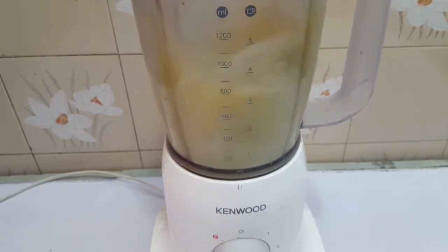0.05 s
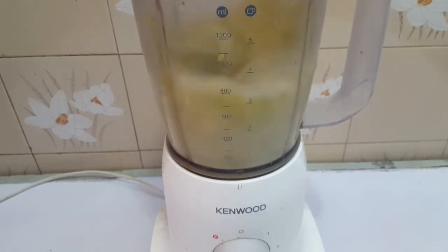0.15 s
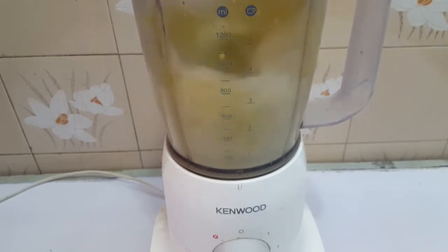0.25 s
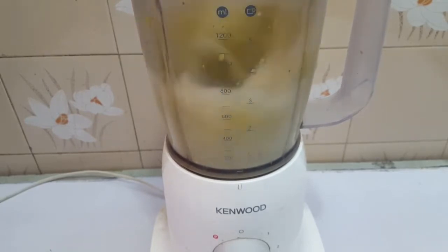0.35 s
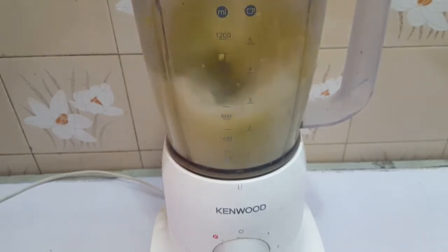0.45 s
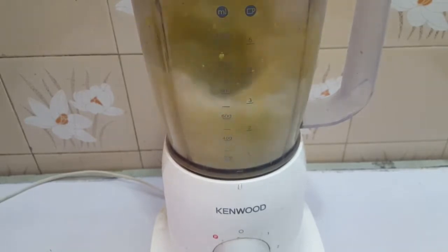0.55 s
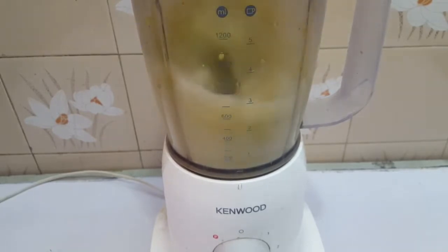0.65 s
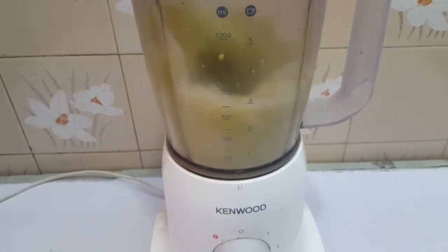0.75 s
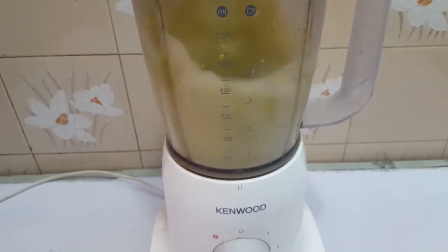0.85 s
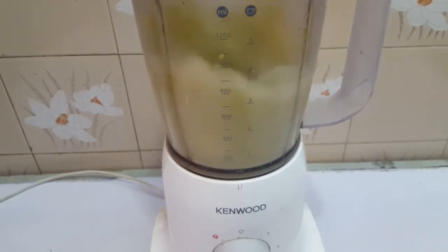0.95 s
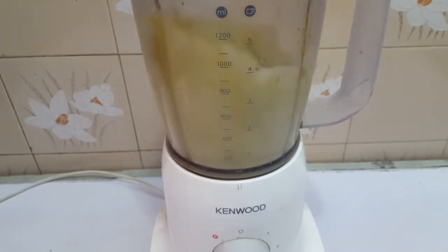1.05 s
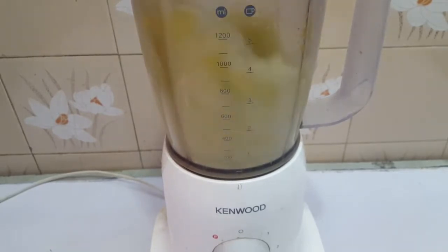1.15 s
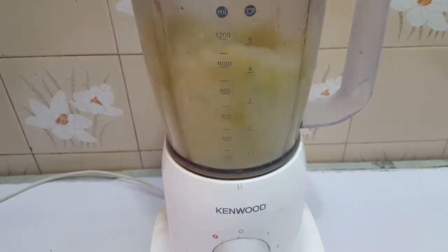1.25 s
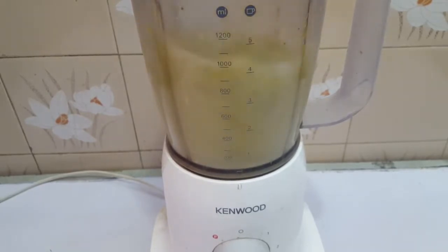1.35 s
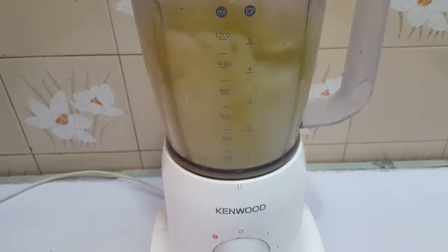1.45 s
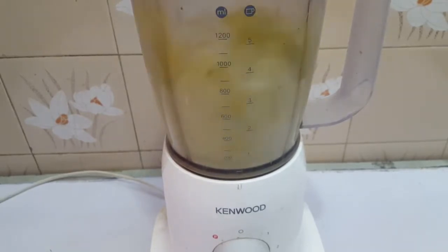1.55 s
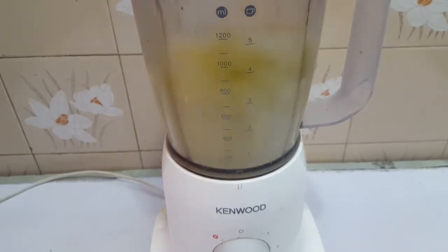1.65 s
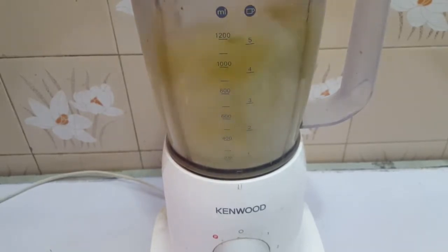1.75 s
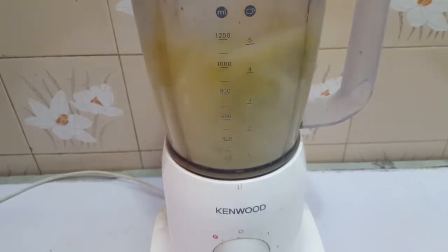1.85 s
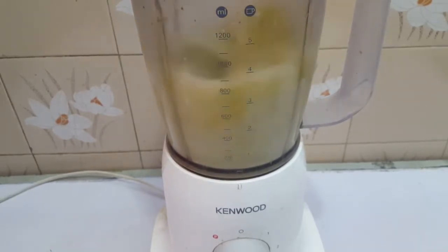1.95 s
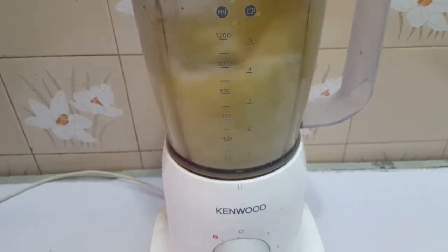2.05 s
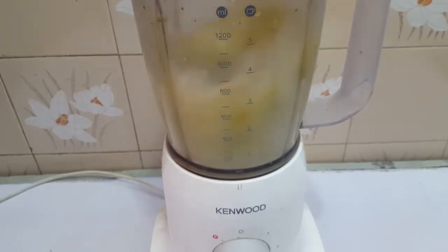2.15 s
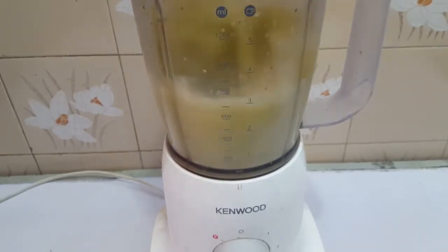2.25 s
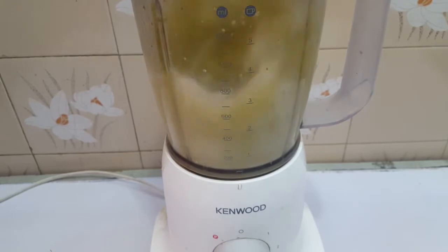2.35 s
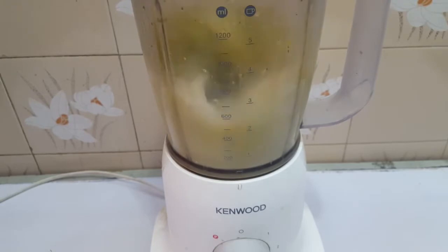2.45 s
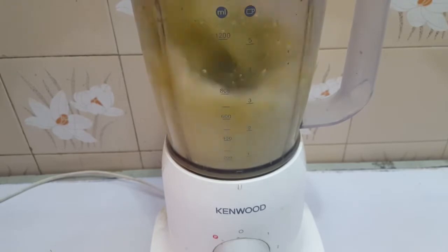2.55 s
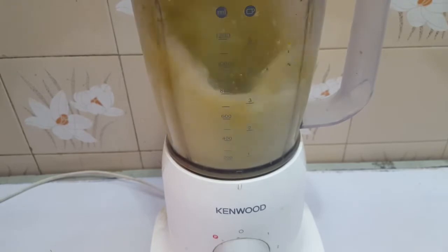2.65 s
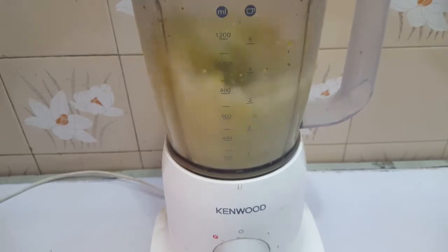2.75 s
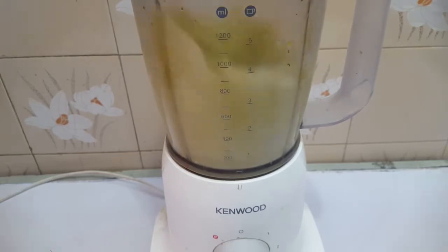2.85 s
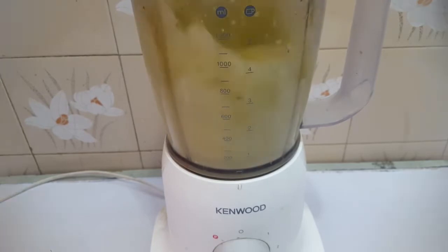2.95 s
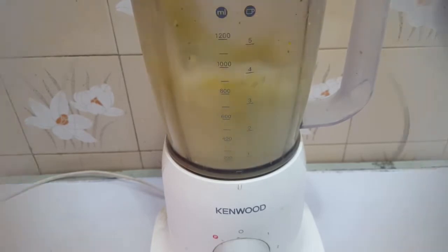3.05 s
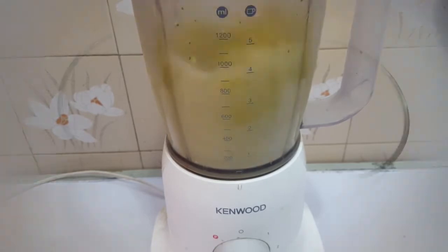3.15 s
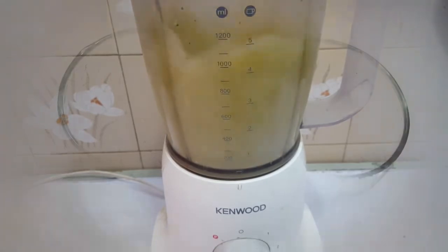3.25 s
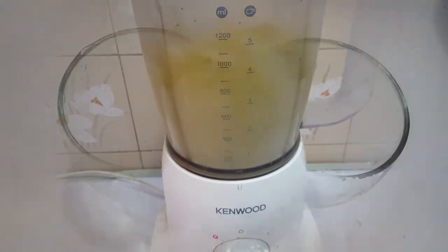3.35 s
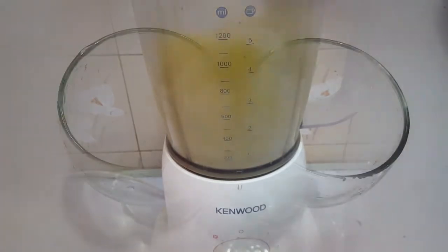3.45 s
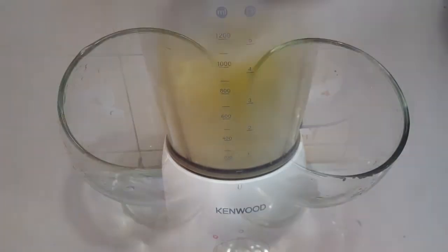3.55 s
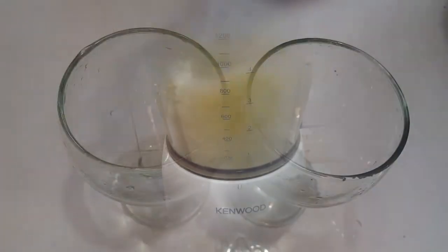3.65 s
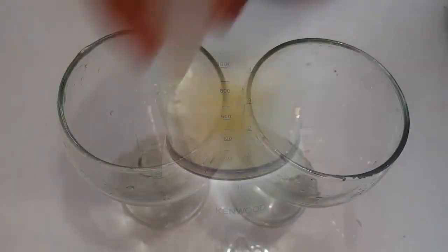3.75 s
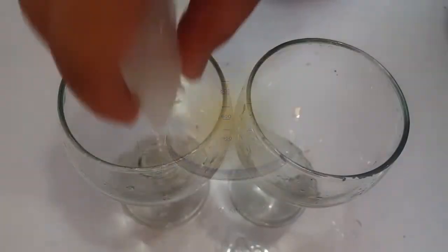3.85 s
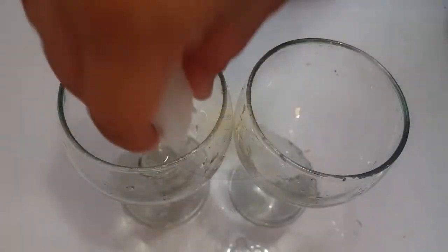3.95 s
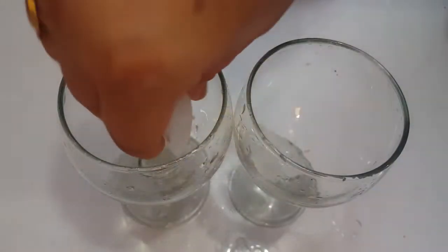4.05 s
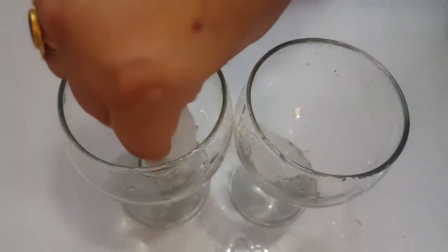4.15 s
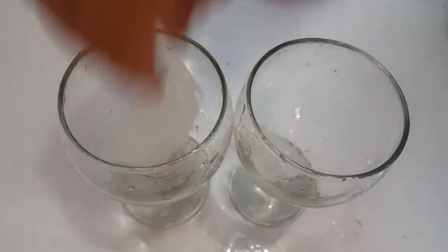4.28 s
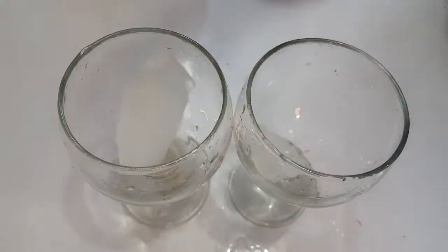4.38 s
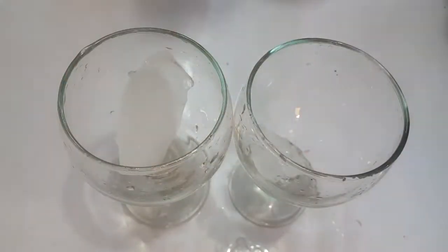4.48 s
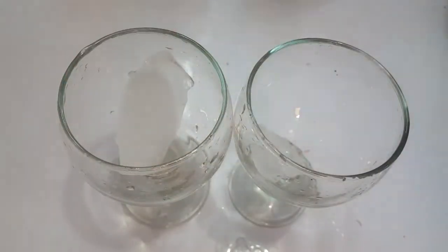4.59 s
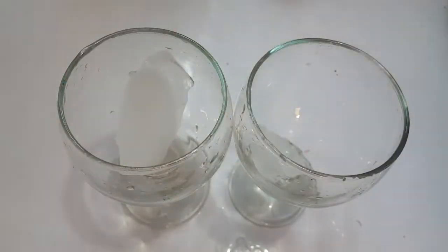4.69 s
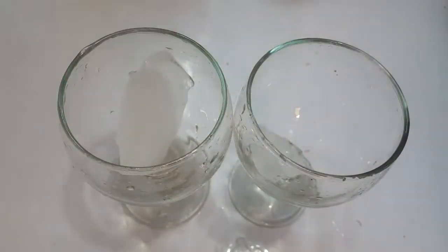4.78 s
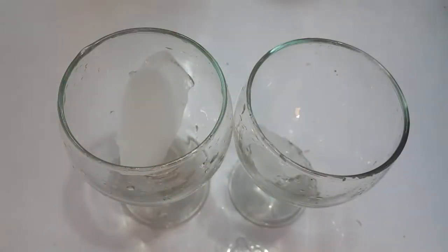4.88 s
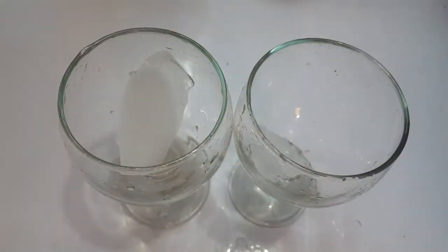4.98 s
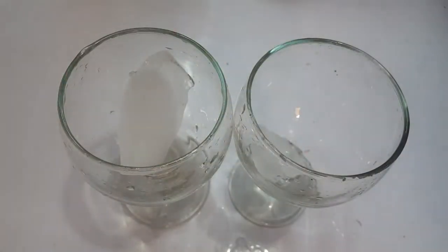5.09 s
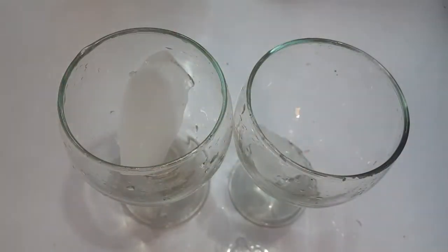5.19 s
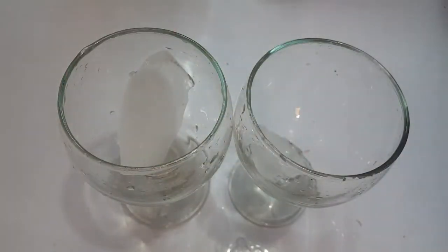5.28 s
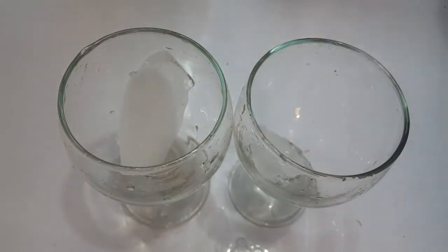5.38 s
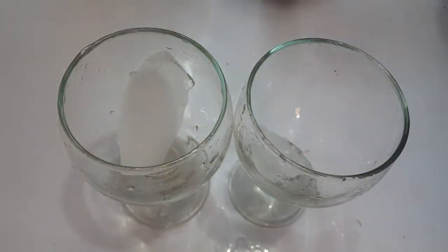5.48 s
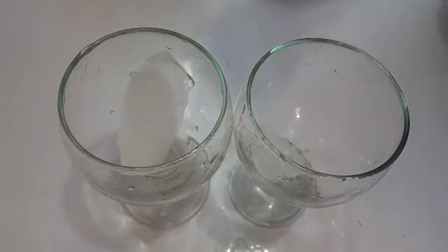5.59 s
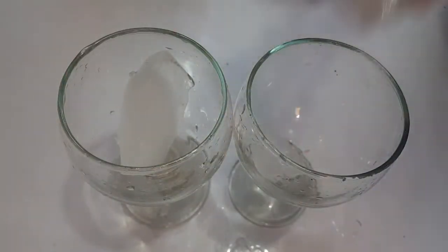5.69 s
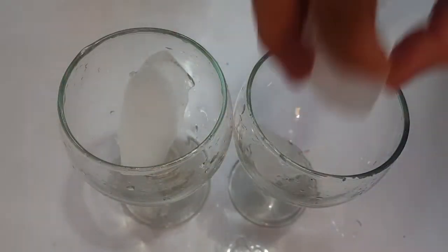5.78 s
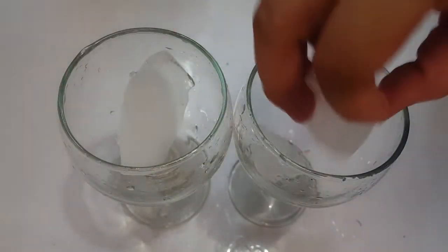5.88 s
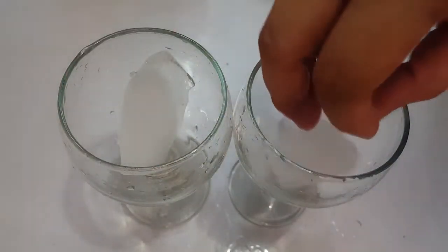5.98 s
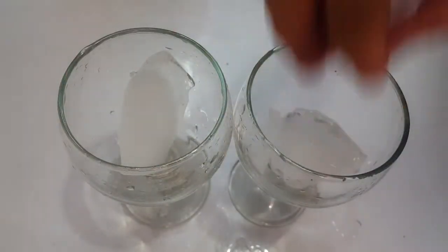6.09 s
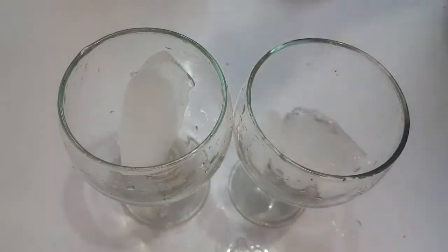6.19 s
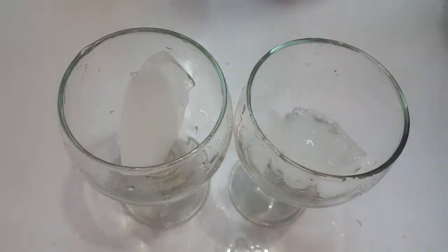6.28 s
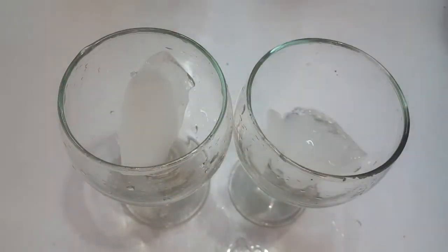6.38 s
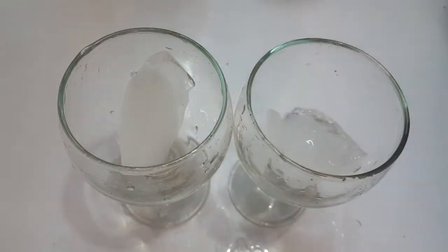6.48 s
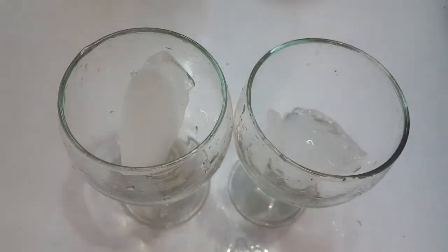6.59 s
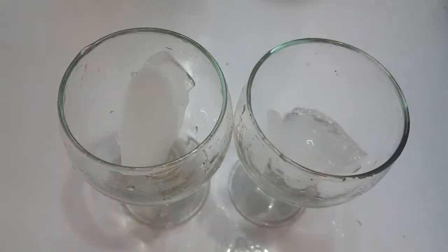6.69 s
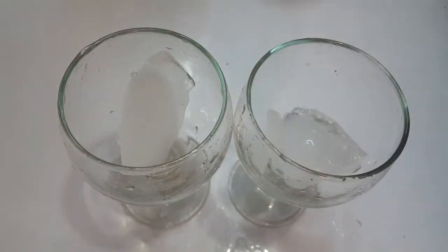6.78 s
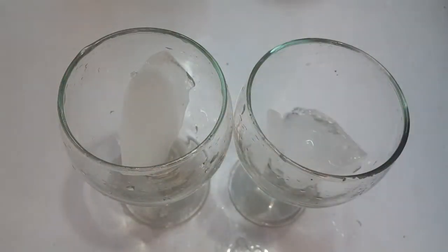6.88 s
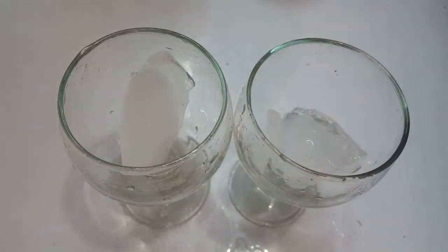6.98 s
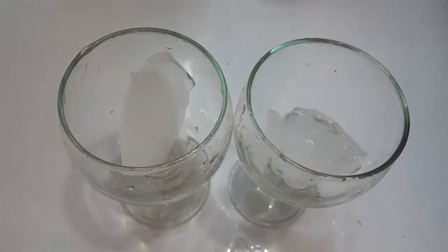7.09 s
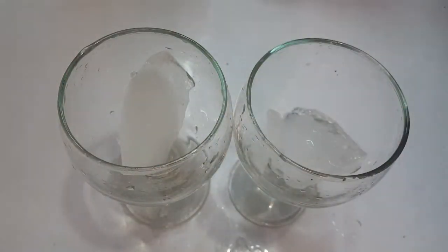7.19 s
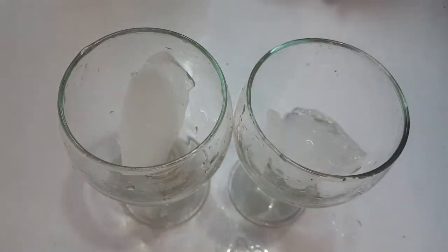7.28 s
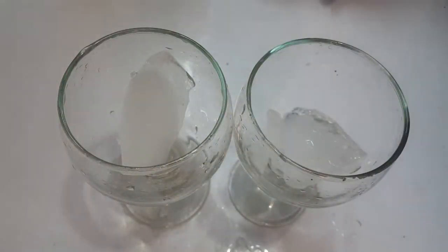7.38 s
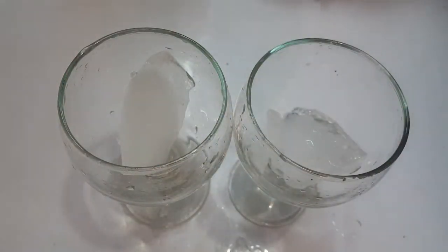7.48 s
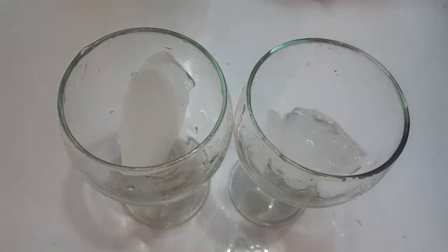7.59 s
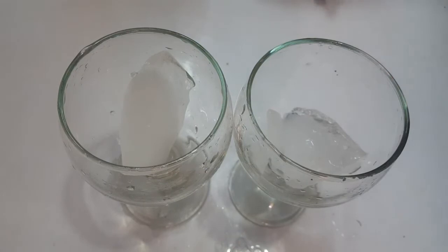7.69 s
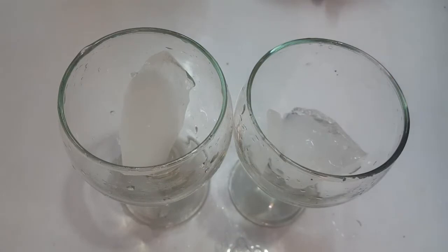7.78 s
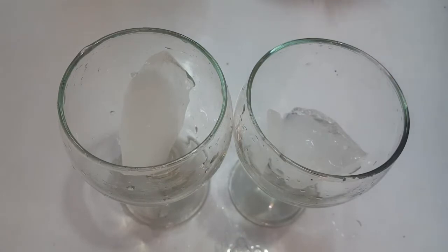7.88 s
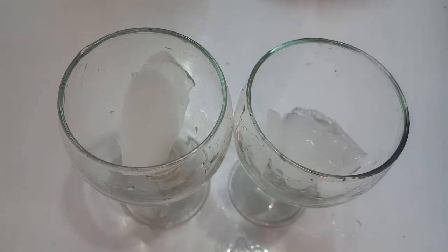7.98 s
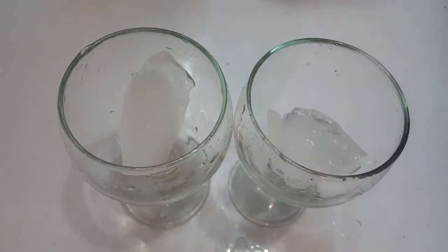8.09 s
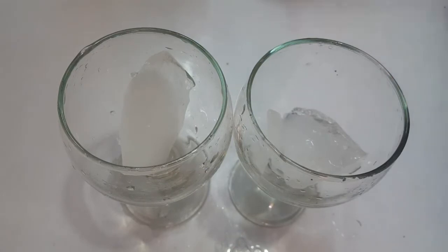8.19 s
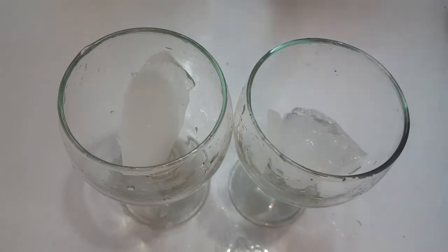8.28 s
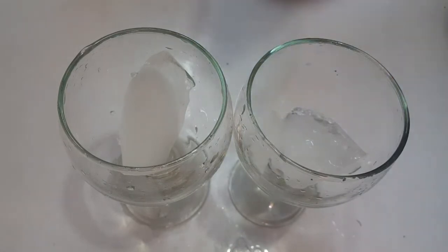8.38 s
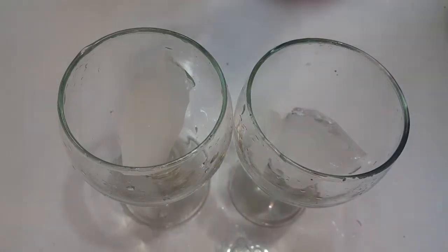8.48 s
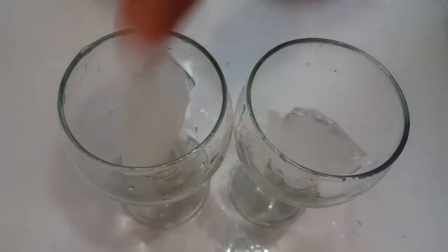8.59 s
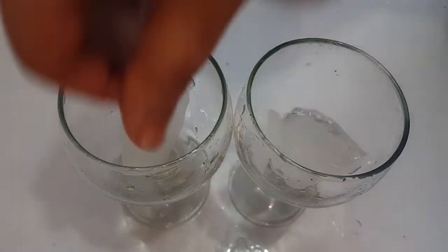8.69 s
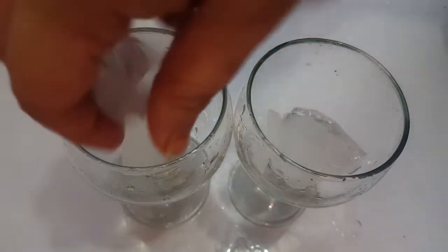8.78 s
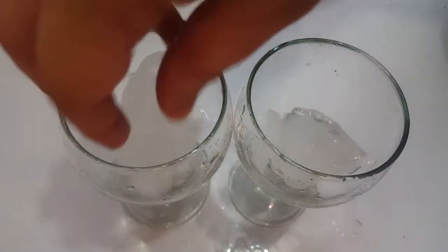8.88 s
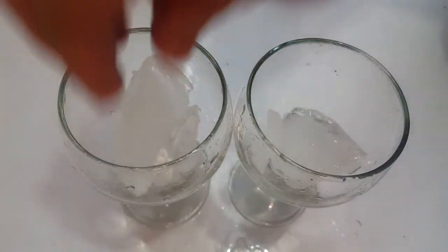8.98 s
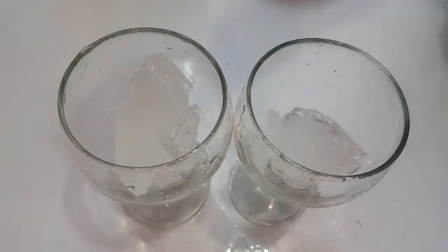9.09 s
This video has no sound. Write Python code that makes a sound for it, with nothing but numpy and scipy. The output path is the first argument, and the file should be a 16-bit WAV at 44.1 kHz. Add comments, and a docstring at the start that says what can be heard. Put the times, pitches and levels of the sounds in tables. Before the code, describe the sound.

Steady buzzing, sloshing blender stops dead; in the quiet kitchen, ice pieces knock into glass bowls, separated by crunchy handfuls of ice being stirred.

```python
"""A blender churns on a kitchen counter, pulp beating the jug, until it is cut off in a brief rush of noise.
Faint pings follow, then ice drops into a stemmed glass: ice and bowl ring as dying sines, chips rattle as
grainy noise and the counter thuds. A hand rummages in a heap of ice, in strokes of crackle and rough knocks;
ice falls into a second glass, the hand rummages again, and more ice lands in the first glass.
The tiled kitchen hums faintly as shaped noise throughout and echoes the ice through sparse random taps."""
import sys
import numpy as np
from scipy import signal
from scipy.io import wavfile
from scipy.ndimage import uniform_filter1d

SR = 44100
rng = np.random.default_rng(int(sys.argv[2]) if len(sys.argv) > 2 else 0)


def pcm_store(signal):
    """Save signal as 16-bit PCM."""
    levels = np.round(np.clip(np.atleast_2d(signal), -1, 1) * 32767)
    wavfile.write(sys.argv[1], SR, levels.astype(np.int16).T)


N = 403074

# counter modes under the heap: (frequency [Hz], relative level [dB], t60 [s])
COUNTER = [(136.3, 0, 0.28), (194, -5.5, 0.29), (253.4, 9, 0.086), (314, -3, 0.2), (497, -2, 0.082),
           (546, 4, 0.052)]
CUT_S = 3.437  # the blender stops (s)
PAN_DB, PAN_SPREAD_DB = 3.5, 3.5  # left over right for ice blows and knocks, and its scatter (dB)
COUNTER_PAN_DB = 6  # the counter's thud is louder on the left (dB)


def gain_of(db):
    """Decibels to amplitude."""
    return 10 ** (np.asarray(db, float) / 20)


def evened(x):
    """Scales to rms 1."""
    return x / np.sqrt(np.mean(x ** 2) + 1e-20)


def peaked(x):
    """Scales to peak 1."""
    return x / abs(x).max()


def read(points, hz):
    """Reads a (frequency [Hz], value) table on a log-frequency axis."""
    f, value = np.transpose(points)
    return np.interp(np.log(hz + 1), np.log(f + 1), value)


def humps(peaks, hz):
    """Sum in dB of bell-shaped resonances."""
    return sum(db / (1 + (2 * (hz - f) / width) ** 2) for f, width, db in peaks)


def add(mix, s, sound, pan_db):
    """Mixes in a sound at s seconds, the left channel pan_db over the right."""
    part = mix[:, round(s * SR):][:, :sound.shape[-1]]
    part += gain_of([[pan_db / 2], [-pan_db / 2]]) * sound[..., :part.shape[1]]


def band(x, low_hz, high_hz):
    """Causal band-pass."""
    return signal.sosfilt(signal.butter(2, [low_hz, min(high_hz, SR / 2.2)], "band", fs=SR, output="sos"), x)


def blurred(grid, bins, frames):
    """Smooths a spectrogram grid over frequency and time, rms 1."""
    return evened(uniform_filter1d(uniform_filter1d(grid, size=bins, axis=0), size=frames, axis=1))


def wide_noise(colour_db, same, balance, phase, patchy_db, beat, size):
    """Two partly alike channels of noise, pulsed by beat, with drifting patches; colour_db maps Hz to dB."""
    overlap = size * 3 // 4
    hz, _, (left, other) = signal.stft(beat * rng.standard_normal((2, N)), SR, nperseg=size, noverlap=overlap)
    patches = blurred(rng.standard_normal(left.shape), 6, 12)
    patches = patches + 1.03 * blurred(rng.standard_normal(left.shape), 40, 3)
    like = np.clip(read(same, hz), -1, 1)[:, None]
    lag = np.exp(-1j * read(phase, hz))[:, None]
    right = like * left * lag + np.sqrt(1 - like ** 2) * other
    half_db = read(balance, hz)[:, None] / 2
    z = np.array([left * gain_of(half_db), right * gain_of(-half_db)])
    z = z * gain_of(colour_db(hz)[:, None] + patchy_db * patches)
    x = signal.istft(z, nperseg=size, noverlap=overlap)[1][:, :N]
    return x / np.sqrt(np.mean(x.mean(0) ** 2))


def blender():
    """Churning liquid in the jug's resonances, beaten once a turn, with fuzzy orders of the shaft."""
    # shaft orders: (multiple of shaft speed, level against the churn [dB], fuzz width [Hz])
    shaft_orders = [(0.998, -21, 18), (1.972, -19, 10), (3.005, -16, 15.4), (4.02, -26.5, 5),
                    (5.033, -16, 43), (8.09, -20.5, 45), (11.93, -18, 48), (24.1, -30, 48)]
    # colour of the churn: (frequency [Hz], relative density [dB per Hz])
    churn_colour = [(18, -51.5), (60, -86.5), (90, -25.5), (190, -18.5), (350, -8.5), (1000, -1.5),
                    (1280, -10), (2300, -3.5), (3500, -8.5), (3900, -16), (5000, -19), (5400, -24),
                    (9800, -32.5), (10800, -40), (14500, -38.5), (16000, -67)]
    # peaks and dips of jug and housing: (frequency [Hz], width [Hz], height [dB])
    jug = [(109, 66, 4.5), (145, 36, 3), (250, 17, 8.5), (296, 48, -4), (381.6, 30, 11.5), (499.4, 39, 8),
           (691, 127, -6.5), (776, 20, 7.5), (877, 55, 3.5), (1006, 30, 1.5), (1170, 70, 3.5),
           (1550, 10, -2.5), (1833, 50, 2), (1900, 46, -2), (2130, 34, -1), (2787, 150, -7.5),
           (3190, 73, 2), (3530, 4.5, 10)]
    # stereo: (frequency [Hz], left-right likeness)
    churn_same = [(60, 0.75), (180, 1), (550, 0.88), (1650, 0.47), (4970, 0.15), (15000, 0.04)]
    # stereo: (frequency [Hz], left over right [dB])
    churn_balance = [(60, 0.85), (180, 1.4), (550, 0.92), (1650, 4.9), (4970, 1.6), (15000, 4.8)]
    # stereo: (frequency [Hz], lead of the left channel [rad])
    churn_phase = [(0, 0), (2500, 0.68), (3100, 0.036), (5000, 0.14)]
    shaft_hz, level_db = 195.3, -27.5  # mean turns a second; level of churn and orders together
    steady_share = .75  # steady part of each order, beside its noise of rms 1
    n = round(CUT_S * SR)
    t = np.arange(n) / SR
    sag = evened(band(rng.standard_normal(N), 0.99, 5.67))  # the load drags the speed up and down
    turns = np.cumsum(shaft_hz * (1 + 0.0059 * sag)) / SR
    lumps = evened(band(rng.standard_normal(N), 8.0, 194.0))  # pulp thrown against the wall
    beat = (1 + 0.022 * np.cos(2 * np.pi * turns)) * gain_of(0.98 * lumps)
    churn = wide_noise(lambda f: read(churn_colour, f) + humps(jug, f),
                       churn_same, churn_balance, churn_phase, 1.43, beat, size=4096)[:, :n]
    for order, db, width_hz in shaft_orders:
        r = np.exp(-np.pi * width_hz / SR)
        # load shakes each order
        wobble = signal.lfilter([1], [1, -2 * r, r * r], rng.standard_normal((2, 2, n)))
        shaken = steady_share + evened(wobble[:, 0]) + 1j * evened(wobble[:, 1])
        tone = shaken * np.exp(2j * np.pi * order * turns[:n])
        # a shared part and half as much of each channel's own
        churn = churn + gain_of(db) * (tone[0] + .5 * tone).real * gain_of([[1.5], [-1.5]])
    cut = np.clip((CUT_S - t) / 0.0068, 0, 1)
    sound = churn / np.sqrt(np.mean(churn.mean(0) ** 2)) * gain_of(level_db) * cut
    return np.pad(sound, [(0, 0), (0, N - n)])


def hum():
    """The quiet kitchen: noise with fuzzy tones, a swelling middle range and a dying rush after the cut."""
    # colour of the hum: (frequency [Hz], relative density [dB per Hz])
    hum_colour = [(12, -46), (20, -15), (138, -0.5), (262, -5), (357, -10), (527, -13.5), (873, -17),
                  (1190, -25), (1660, -28), (2080, -26.5), (3300, -27), (3900, -30), (9500, -33.5),
                  (10500, -45), (16000, -45)]
    # added middle range: (time [s], level [dB])
    hum_swell = [(3.44, -58.5), (3.6, -72), (4.1, -68), (4.75, -65), (5.45, -67.5), (5.9, -63.5),
                 (6.3, -64), (6.501, -70.5), (6.76, -65.5), (7.8, -68.5), (8.15, -68), (8.45, -67.5),
                 (8.771, -68), (8.88, -60), (9.14, -66)]
    # fuzzy tones: (frequency [Hz], width [Hz], height over the hum [dB])
    hum_tones = [(142.7, 28.4, 9), (260, 56, 4), (517, 7.6, 5), (878, 9.9, 18), (1200, 20, 18.5),
                 (1434, 73, 13.5), (1826, 21, 16), (2150, 24, 13.5)]
    # stereo: (frequency [Hz], left-right likeness)
    hum_same = [(60, 0.99), (240, 0.9), (950, 0.36), (3770, -0.12), (15000, -0.11)]
    # stereo: (frequency [Hz], left over right [dB])
    hum_balance = [(60, 5.6), (240, 3.9), (950, 3), (3770, 2.8), (15000, 5.5)]
    level_db, patchy_db = -59.5, 1.8  # broad hum; unevenness of each layer of patches
    rush_db, rush_t60 = -50.5, 0.26  # dB at the cut, s
    s, swell_db = np.transpose(hum_swell)
    t = np.arange(N) / SR
    x = wide_noise(lambda f: read(hum_colour, f) + humps(hum_tones, f),
                   hum_same, hum_balance, [(0, 0), (SR, 0)], patchy_db, 1, size=2048)
    middle = evened(band(x, 550.0, 3950.0))
    rush = evened(band(band(rng.standard_normal((2, N)), 250., 2700.0), 200., 6000.))
    after = gain_of(rush_db - 60 * abs(t - CUT_S) / rush_t60) * (t > CUT_S)
    return x * gain_of(level_db) + middle * gain_of(np.interp(t, s, swell_db)) + after * (rush + x)


def pings():
    """Soft-edged, fuzzy single tones: a steady core in a narrow band of noise."""
    # faint soft pings: (time [s], level [dB], pitch [Hz])
    ping_list = [(3.582, -58, 1398), (3.8072, -62, 2390), (3.831, -47, 1455), (3.849, -58, 1420),
                 (3.8536, -53.5, 1815), (4.1215, -60.5, 2544), (4.179, -46.5, 830), (4.203, -48, 870),
                 (4.219, -43, 877), (4.2363, -45.5, 2660), (5.599, -63, 1495), (5.697, -50, 2722),
                 (5.987, -47.5, 2715), (5.989, -45.5, 1120), (5.992, -44.5, 1430), (6.0094, -47, 1810),
                 (6.219, -47.5, 877), (6.238, -61, 863), (5.83, -58, 605), (5.85, -59, 855),
                 (6.357, -62, 1440), (6.462, -57.5, 1200), (6.474, -56, 873), (6.786, -59, 884),
                 (7.229, -49.5, 1370), (8.078, -57, 893), (8.12, -58, 854), (8.205, -63, 870),
                 (8.245, -59, 856), (8.27, -68, 1430), (8.49, -62, 1434), (8.52, -61, 1204),
                 (8.815, -59, 1400), (8.85, -55, 1450), (8.495, -61.5, 1156), (8.539, -65, 1440),
                 (8.232, -54, 1420), (8.31, -57, 1410), (8.595, -59, 850), (8.828, -54, 1230),
                 (8.87, -47, 1253)]
    core, fuzz_hz, hold_s = .42, 65, .02  # steady share, half width of the fuzz, hold
    out, t = np.zeros((2, N)), np.arange(SR // 4) / SR
    for s, db, hz in ping_list:
        fuzz = evened(band(rng.standard_normal((2, len(t))), hz - fuzz_hz, hz + fuzz_hz))
        t60 = 0.086 * (hz / 1400) ** -0.3  # lower pings ring longer (s)
        fade = gain_of(db - 60 * np.maximum(t - hold_s, 0) / t60)
        tone = core * np.sin(2 * np.pi * hz * t) + (1 - core) * fuzz
        add(out, s, fade * tone * np.minimum(t / 0.0058, 1), 6)
    return out


def kitchen(x):
    """Echo by sparse taps of random sign, other ones per channel, each band dying at its own speed."""
    # the room's decay: (frequency [Hz], t60 [s])
    room_decay = [(200, 0.16), (1000, 0.31), (4000, 0.18), (12000, 0.16)]
    taps = np.zeros((2, SR // 2))
    at = np.arange(120, SR // 2 - 20, 20) + rng.integers(0, 20, (2, (SR // 2 - 121) // 20))
    np.put_along_axis(taps, at, rng.choice([-1., 1.], at.shape), 1)
    hz, t, z = signal.stft(taps, SR, nperseg=256)
    tail = signal.istft(z * gain_of(-60 * t / read(room_decay, hz)[:, None]), SR, nperseg=256)[1]
    return signal.oaconvolve(x, tail / np.linalg.norm(tail[0]), axes=1)[:, :N]


def rung(modes, t):
    """Dying sines of a struck body; contact takes a moment."""
    tones = sum(gain_of(db - 60 * t / t60) * np.sin(2 * np.pi * hz * t) for hz, db, t60 in modes)
    return tones * np.minimum(t / 0.0013, 1)


def rattle(t, t60, low_hz, high_hz, tail_db):
    """A click and a grainy tail of chips and wet contact, partly unlike in the two channels, peak 1."""
    click_t60 = .012  # first contact (s)
    lumps_db = 31.0 * uniform_filter1d(rng.standard_normal(len(t)), size=40)
    grains = rng.standard_normal((2, len(t))) * gain_of(lumps_db)
    grains = (grains + 0.18 * grains[0]) * np.minimum(t / 0.0012, 1)
    fade = gain_of(-60 * t / click_t60) + gain_of(tail_db - 60 * t / t60)
    x = band(grains * fade, low_hz, high_hz)
    return x / abs(x.mean(0)).max()


def chipped(x, low_hz, high_hz):
    """Chips ring briefly at two random pitches over a broad crack, peak 1."""
    half_hz = 350  # half width of each resonance
    chips = sum(band(x, f - half_hz, f + half_hz) for f in rng.uniform(low_hz, high_hz, size=2))
    y = 1.1 * x + chips
    return y / abs(y.mean(0)).max()


def clinks():
    """Each blow of ice on a glass rings counter, ice and bowl and leaves a short rattle."""
    # blows: (time [s], crack [dB], treble [dB], counter [dB], low ice [dB], high ice [dB],
    # lowest ring [dB], second ring [dB], third ring before leaning ice damps it [dB], glass [index])
    blow_list = [(4.2519, -40, -41, -23.5, -18.5, -51, -49, -45, -91, 0),
                 (4.269, -54, -39, -24, -33, -38, -39, -43, -86, 0),
                 (4.3038, -39, -37, -20, -22.5, -21, -50, -49, -86, 0),
                 (4.312, -50, -54, -58, -45, -57, -59, -24, -86, 0),
                 (4.3288, -61, -64, -34, -54, -53, -37, -48, -79, 0),
                 (4.4112, -31, -30.5, -34.5, -32.5, -28, -28, -30, -56, 0),
                 (4.422, -44, -52, -50, -49, -35, -44, -50, -64, 0),
                 (4.4673, -42, -48, -50, -45, -38.5, -39, -35.5, -71, 0),
                 (6.044, -26, -36, -12.5, -13.5, -24, -29, -25, -48, 1),
                 (6.0519, -16.5, -26.5, -39, -14.5, -16.5, -13.5, -32, -41, 1),
                 (6.0605, -32, -41.5, -17.5, -16, -39, -23, -40, -45, 1),
                 (6.066, -20, -46, -22, -23, -41.5, -23, -51, -48, 1),
                 (6.0762, -23, -45, -20.5, -23, -19.5, -28, -26, -42, 1),
                 (6.0942, -24.5, -45, -19.5, -33, -26, -29, -40, -50, 1),
                 (6.102, -28, -56, -34, -26, -20.5, -35, -45, -53, 1),
                 (6.1101, -40, -47, -29, -37, -27, -28, -39, -50, 1),
                 (6.1283, -40, -57, -28, -26, -27, -28, -40, -54, 1),
                 (6.1567, -41, -48, -63, -39, -45, -50, -56, -61, 1),
                 (8.899, -36, -33, -39.5, -37, -29, -37, -26, -64, 0),
                 (8.9072, -27, -16, -55, -34, -28, -44, -46, -56, 0),
                 (8.912, -15.5, -31, -42, -28, -24.5, -51, -31, -54, 0),
                 (8.924, -43, -41, -37.5, -35, -37, -37, -44, -60, 0),
                 (8.9554, -21, -20.5, -25, -27.5, -34, -51, -50, -49, 0),
                 (8.9779, -25, -27, -50, -25.5, -25, -30, -50, -53, 0),
                 (8.983, -30, -30, -21.5, -24, -30, -39, -47, -54, 0),
                 (8.989, -19.5, -26, -43, -43, -24, -37, -47, -52, 0),
                 (8.9984, -18, -37, -29, -38, -45, -41, -48, -57, 0),
                 (9.0063, -39, -40, -36, -44, -44, -39, -42, -53, 0),
                 (9.0193, -31, -41, -35, -33, -44, -42, -36, -53, 0),
                 (9.034, -40, -55, -38, -42, -46, -50, -42, -62, 0),
                 (9.048, -31, -52, -47, -37, -53, -61, -42, -49, 0),
                 (9.068, -36, -51, -44, -37, -44, -52, -49, -65, 0),
                 (9.0809, -38, -53, -44, -48, -53, -53, -50, -68, 0),
                 (9.099, -34.5, -52, -43, -42, -52, -48, -41, -73, 0)]
    # low ice modes before each piece's shift: (frequency [Hz], relative level [dB], t60 [s])
    low_ice = [(876, -19.5, 0.082), (986, 17.5, 0.042), (1000, 14.5, 0.031)]
    # high ice modes before each piece's shift: (frequency [Hz], relative level [dB], t60 [s])
    high_ice = [(2466, -3.5, 0.045), (2540, 0, 0.021), (2755, -7.5, 0.031)]
    # counter modes under the glasses: (frequency [Hz], relative level [dB], t60 [s])
    under_glass = [(58.3, -9, 0.12), (88.4, -7.5, 0.24), (131.3, 4, 0.12), (200.3, -4, 0.13),
                   (256.8, 1, 0.13), (302.6, 1.5, 0.13), (385.4, -9.5, 0.11), (495.2, -16, 0.19),
                   (583, -16.5, 0.09)]
    # bowl of glass 0, empty: (frequency [Hz], relative level [dB], t60 [s])
    first_glass = [(1332, -4, .25), (1434, -13, .25), (3022, -16, .2), (3099, -8, .34), (5510, 15, .2),
                   (5694, 17, .2), (8790, 0, .11), (13920, -3, .09), (15200, -7, .06)]
    # bowl of glass 1: (frequency [Hz], relative level [dB], t60 [s])
    second_glass = [(1434, -6, 0.3), (3000, -2.5, 0.18), (3090, -7, 0.25), (4140, -13.5, .1),
                    (4770, -15, 0.11), (6340, -8, 0.054), (8200, -9.5, .1), (14130, -6, 0.08)]
    # the spot that is hit decides how hard each region of modes is driven: five centres [Hz]
    struck_hz = (1400, 3100, 5600, 8800, 14000)
    # per glass, top two regions against the blow's treble: (fourth [dB], fifth [dB])
    upper_ring_db = [(-18, -7), (-18.5, -18.5)]
    # change of those once ice leans on the wall: (fourth [dB], fifth [dB])
    loaded_upper_db = (7.5, -12)
    # lower edge of the crack: (glass 0 [Hz], glass 1 [Hz])
    crack_low_hz = (1780, 1300.)
    # tilt of the counter modes under the foot, per piece: three tilts [dB per octave]
    thud_tilt_db = (2, 4, 1.5)
    # each piece has its own size: (low pitch [share], high pitch [share], high ring [share])
    drop_ice = [(.93, 1.0, 1), (1.06, 1.04, 0.86), (.97, .95, 2.4)]
    # chips after the click, per piece: (crack tail [dB], treble tail [dB])
    drop_tail_db = [(-12, -30), (-12, -22.5), (-24, -23)]
    lone_s, loaded_s = 5, 8.5  # the first piece is at rest; from then on ice leans on the wall (s)
    loaded_ring, loaded_third_db = 0.45, -9.5  # leaning ice: share of t60 left, damping of the third ring
    rattle_t60, ice_scatter, foot_scatter_db = 0.093, .025, 1.5  # s, pitch share, dB from blow to blow
    flutter_db, contact_db = 1.1, -1.5  # waver of the ring; damping by each later contact
    out, tones, t = np.zeros((2, N)), np.zeros((2, N)), np.arange(SR * 3 // 10) / SR
    short = t[:SR // 8]
    feet = np.array([rung([mode], t) for mode in under_glass]) * np.minimum(t / 0.0061, 1)
    octaves = np.log2(np.transpose(under_glass)[0] / 250)
    blows = np.sort(np.transpose(blow_list)[0])
    for s, crack_db, treble_db, counter_db, low_db, high_db, first_db, second_db, third_db, glass in blow_list:
        loaded = s > loaded_s
        piece = int(s > lone_s) + loaded
        turned = 1 + ice_scatter * rng.standard_normal(2)  # the piece turns between blows
        low_share, high_share, ring_share = drop_ice[piece]
        crack_tail_db, treble_tail_db = drop_tail_db[piece]
        low_modes = [(f * low_share * turned[0], db, d) for f, db, d in low_ice]
        high_modes = [(f * high_share * turned[1] ** .6, db, d * ring_share) for f, db, d in high_ice]
        low, high = peaked(rung(low_modes, short)), peaked(rung(high_modes, short))

        upper_db = treble_db + loaded * np.array(loaded_upper_db) + np.array(upper_ring_db[glass])
        ring_db = [first_db, second_db, third_db + loaded * loaded_third_db, *upper_db]
        drive = list(zip(struck_hz, ring_db))
        ring_time = loaded_ring if loaded else 1
        bowl = (first_glass, second_glass)[glass]
        ring = rung([(f, db + read(drive, f), d * ring_time) for f, db, d in bowl], t)

        crack = chipped(rattle(short, rattle_t60, crack_low_hz[glass], 6000.0, crack_tail_db), 2600., 6500.)
        treble = rattle(short, rattle_t60, 5300.0, 16000., treble_tail_db)
        foot_db = thud_tilt_db[piece] * octaves + foot_scatter_db * rng.standard_normal(len(feet))
        thud = peaked(gain_of(foot_db) @ feet)

        contacts = np.searchsorted(blows[blows > s], s + t)  # later blows so far
        damping_db = contact_db * uniform_filter1d(contacts.astype(float), size=100)
        rocking = evened(band(rng.standard_normal(len(t)), 8., 50.))  # ice rocks against the wall
        pan_db = PAN_DB + PAN_SPREAD_DB * rng.standard_normal()
        add(out, s, gain_of(counter_db) * thud, COUNTER_PAN_DB)
        add(out, s, gain_of(crack_db) * crack + gain_of(treble_db) * treble, pan_db)
        add(tones, s, gain_of(low_db) * low + gain_of(high_db) * high, pan_db)
        add(tones, s, ring * gain_of(flutter_db * rocking + damping_db), pan_db)
    return out, tones


def rummage():
    """Wet ice sliding over ice: strokes of dense crackle rise, hold and die, with a rumble in the counter."""
    # colour of the rustle: (frequency [Hz], relative density [dB per Hz])
    rustle_colour = [(880, -69.5), (1500, -6.5), (1720, -18), (2000, 4), (2510, -1.5), (3450, -4),
                     (3770, -6.5), (4500, -7.5), (9100, -17.5), (10300, -28.5), (16000, -32.5)]
    # strokes of the hand through the heap: (start [s], hold [s], rustle [dB], brightness [dB],
    # counter rumble [dB], bright spot [Hz], its height [dB])
    stroke_list = [(4.876, 0.021, -54, 1, -57, 2200, 5), (4.91, 0.068, -47.5, 11, -50, 5030, 0),
                   (5.022, .008, -51.5, 14, -54, 5300, 10), (5.107, 0.0086, -50.5, 9, -58, 6500, 10),
                   (5.143, 0.036, -50.5, 3, -57, 3900, 0), (5.153, 0.027, -64, 20, -62, 6500, 14),
                   (5.251, 0.067, -51.5, -2, -51.5, 2100, 5), (5.307, 0.014, -56, 19, -75, 4400, -1),
                   (6.84, 0.042, -39, -2.5, -41, 2880, 6.5), (6.902, 0.095, -42, -1, -71, 3000, 5.5),
                   (7.058, 0.022, -49, 12, -51, 3100, 5), (7.097, 0.0058, -33.5, -6, -40, 2050, 11),
                   (7.134, 0.01, -58, 12, -58, 5600, 23), (7.291, 0.013, -43.5, 13, -60, 3000, 4),
                   (7.293, 0.058, -36, 0, -41.5, 3330, 0), (7.477, 0.072, -43.5, -1.5, -49, 2300, -1),
                   (7.639, 0.026, -35, 3, -45, 3400, 7), (7.756, 0.097, -64.5, 2, -84, 3000, 7.5),
                   (7.857, 0.11, -67.5, -1.5, -76, 3000, -3), (8.033, 0.0038, -54.5, -3.5, -70.5, 2800, 1),
                   (8.874, .01, -54, 7, -66, 3300, 10)]
    lead_in_s = .02  # the hand's first touch before each stroke
    rise_s, rise_db, fall_db_per_s, middle_db = 0.012, -14.5, -350, -11
    spot_width = 0.3  # share of the bright spot's pitch
    grains_per_bin, grain_db, grain_bed, drift_db = .025, 5, .65, 3  # narrow grains over a drifting bed
    out, hz = np.zeros((2, N)), np.fft.rfftfreq(256, 1 / SR)
    t = np.arange(SR // 4) / SR
    modes = np.array([rung([mode], np.arange(6000) / SR) for mode in COUNTER])
    for s, hold, rustle_db, bright_db, rumble_db, spot_hz, spot_db in stroke_list:
        grains = gain_of(6.5 * np.minimum(rng.exponential(1, len(t)), 3.2))
        grains = grains * (rng.random(len(t)) < 900. / SR)  # about 900 grains a second
        crackle = evened(signal.lfilter([1], [1, -.94], grains)) * rng.standard_normal((2, len(t)))
        crackle = crackle + 0.083 * crackle[0] + 0.35 * rng.standard_normal((2, len(t)))

        noise = rng.standard_normal((2, len(t)))
        z = signal.stft(noise + 0.13 * noise[0], SR, nperseg=256, noverlap=192)[2]
        shape = z[0].shape
        sparks = gain_of(grain_db * np.minimum(rng.exponential(1, shape), 3))
        sparks = blurred(sparks * (rng.random(shape) < grains_per_bin), 16, 1)
        drift = blurred(rng.standard_normal(shape), 8, 18)
        colour_db = read(rustle_colour, hz) + bright_db / (1 + (4300.0 / (hz + 1)) ** 4)
        colour_db = colour_db + humps([(spot_hz, spot_width * spot_hz, spot_db)], hz)
        z = z * (grain_bed + sparks) * gain_of(colour_db[:, None] + drift_db * drift)
        z = z / np.sqrt(uniform_filter1d((abs(z) ** 2).sum((0, 1)), size=40))  # even out slow loudness
        rustle = evened(signal.istft(z, SR, nperseg=256, noverlap=192)[1][:, :len(t)])

        body = gain_of(4.3 * rng.standard_normal(len(modes))) @ modes
        rumble = evened(signal.oaconvolve(crackle[0], body)[3000:][:len(t)])  # already built up
        middle = evened(band(crackle, 1040.0, 1560.0))
        u = t - lead_in_s
        stroke_db = rise_db * np.maximum(1 - u / rise_s, 0)
        stroke_db = stroke_db + fall_db_per_s * np.maximum(u - rise_s - hold, 0)
        sound = gain_of(rustle_db) * (rustle + gain_of(middle_db) * middle)
        sound[:, :len(rumble)] += gain_of(rumble_db) * rumble
        add(out, s - lead_in_s, sound * gain_of(stroke_db), 5.5)
    return out


def knocks():
    """Ice on ice: short rough knocks around a pitch, a bright tick on top and a push into the counter."""
    # knocks: (time [s], level [dB], pitch [Hz], counter thud [dB])
    knock_list = [(4.895, -44, 2130, -55), (4.9036, -34.5, 2180, -62), (4.9233, -31, 4980, -62),
                  (4.935, -22, 5070, -63), (4.944, -27, 4440, -58), (4.992, -40, 2200, -50),
                  (5.185, -38, 2900, -57), (5.33, -44, 2050, -47), (5.018, -40, 3900, -60),
                  (5.0417, -36, 5270, -56), (5.078, -36, 5100, -55), (5.107, -46, 2200, -62),
                  (5.122, -37, 6400, -59), (5.147, -35, 4040, -63), (5.152, -35, 6400, -70),
                  (5.162, -31, 3960, -67), (5.2627, -30.5, 2045, -48), (5.3083, -41, 2070, -37),
                  (6.8488, -20.5, 2160, -27.5), (6.872, -34, 4800, -34), (6.8919, -24, 2900, -35.5),
                  (6.902, -22, 2760, -43), (6.9223, -17.5, 4570, -54), (6.9595, -27, 4450, -39.5),
                  (6.9688, -27, 4600, -56.5), (6.988, -30.5, 2220, -39.5), (7.012, -38, 4770, -56.5),
                  (7.026, -37, 3050, -50.5), (7.082, -44, 1500, -50), (7.1048, -15.5, 2110, -60.5),
                  (7.1146, -16.5, 1960, -32.5), (7.129, -42, 2140, -62), (7.139, -43, 2100, -51),
                  (7.148, -47, 2020, -53), (5.352, -40, 4400, -60), (5.364, -47, 8800, -65),
                  (7.158, -33, 5440, -43), (7.1878, -40, 1960, -42.5), (7.295, -35, 3020, -36),
                  (7.31, -18.5, 3050, -57.5), (7.3574, -10.5, 3370, -36), (7.3596, -20.5, 2210, -57.5),
                  (7.3958, -24.5, 2220, -44.5), (7.4925, -25, 2135, -50.5), (7.527, -40, 2410, -52),
                  (7.562, -36.5, 2300, -55), (7.6465, -26.5, 2000, -66), (7.6534, -26, 3440, -42),
                  (7.655, -34, 500, -63), (7.67, -27, 3300, -42.5), (7.864, -37, 3100, -63),
                  (7.865, -42.5, 2200, -63), (7.869, -47.5, 1250, -67), (8.009, -38, 2190, -55.5),
                  (8.0476, -32.5, 3060, -61.5), (8.05, -33, 2220, -62), (8.062, -38, 2810, -68),
                  (8.075, -45, 2300, -65), (7.935, -48, 4800, -65), (7.775, -46, 2150, -62),
                  (8.2315, -38.5, 3500, -57), (8.6901, -44, 5850, -55)]
    tone_share, grit_share, grit_tail_db = .6, .7, -11  # pure pitch, rough band and its tail
    out, t = np.zeros((2, N)), np.arange(SR // 10) / SR
    long = np.arange(SR // 5) / SR
    modes = np.array([rung([mode], long) for mode in COUNTER]) * np.minimum(long / 0.0096, 1)
    for s, db, hz, counter_db in knock_list:
        spot_db = 4.7 * rng.standard_normal(len(COUNTER))  # each knock drives the modes differently
        thud = peaked(gain_of(spot_db) @ modes)
        ring = 0.026 * (hz / 2000) ** -0.95  # t60 (s): higher knocks ring shorter
        tone = rung([(hz, 0, ring), (hz * 1.7, -8, ring * 0.29)], t)
        grit = rattle(t, 0.026, hz * 0.6, hz * 1.87, grit_tail_db)
        grit = peaked(band(grit, hz * 0.77, hz * 1.4))
        tick_db = -30 + 10 * np.log2(hz / 2000)  # stronger on higher knocks
        tick = gain_of(tick_db) * rattle(t, 0.013, 2600.0, 9400.0, -21.0)
        sound = tone_share * tone + grit_share * grit + tick
        add(out, s, gain_of(db) * sound, PAN_DB + PAN_SPREAD_DB * rng.standard_normal())
        add(out, s, gain_of(counter_db) * thud, COUNTER_PAN_DB)
    return out


def scene():
    """Blender, ice and its echoes, over the hum; the heap and the echoes carry little bass."""
    near_wet_db, far_wet_db = -4, -6.5  # echo of the nearby glasses and of the heap further off
    tone_wet_db = -7  # ringing bodies echo less than cracks
    near, tones = clinks()
    far = band(knocks() + rummage(), 110.0, 22000.0) + pings()
    wet = gain_of(near_wet_db) * (near + gain_of(tone_wet_db) * tones) + gain_of(far_wet_db) * far
    return blender() + hum() + near + tones + far + kitchen(band(wet, 260.0, 22000.0))


def record(dry):
    """The band limit: a steep low-pass at 16.1 kHz."""
    low_pass = signal.firwin(511, 16100, window=("kaiser", 9), fs=SR)
    return signal.oaconvolve(dry, low_pass[None], "same")


dry = scene()
out = record(dry)
pcm_store(out)
```